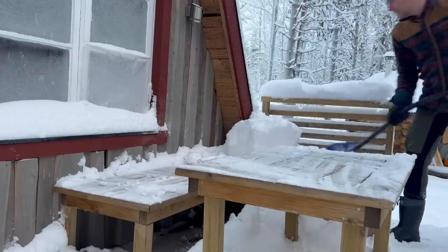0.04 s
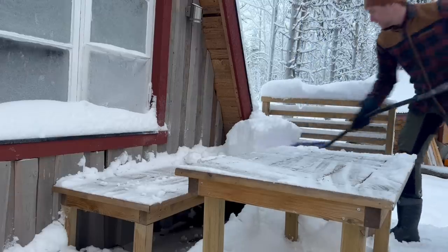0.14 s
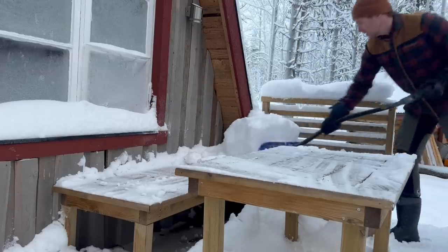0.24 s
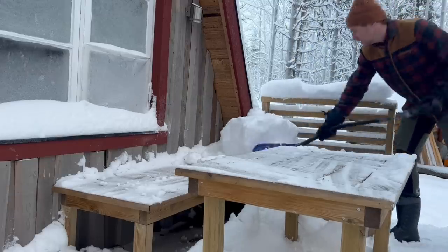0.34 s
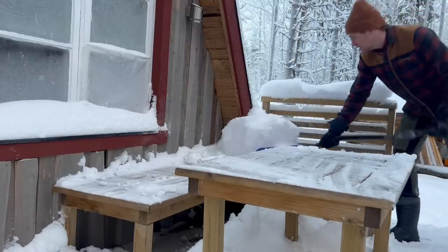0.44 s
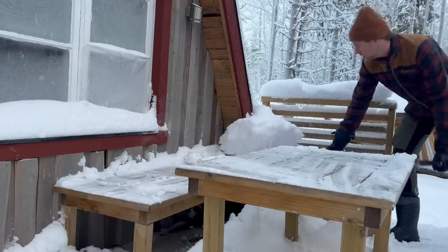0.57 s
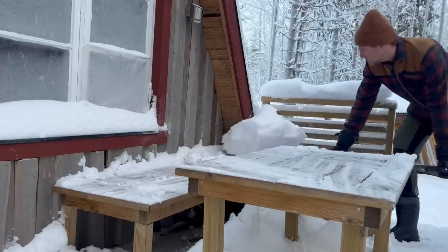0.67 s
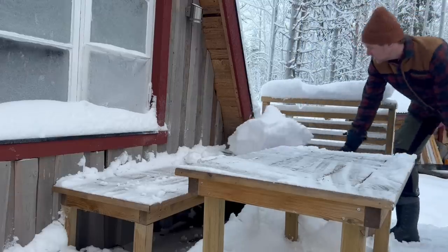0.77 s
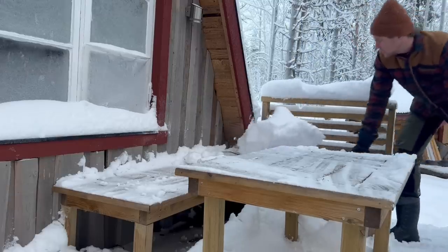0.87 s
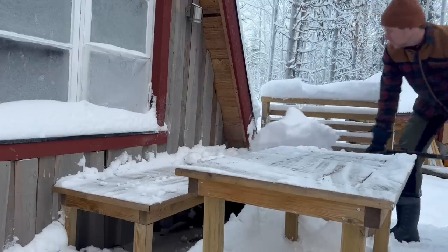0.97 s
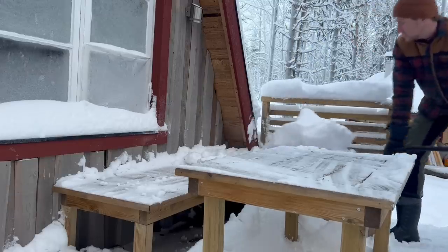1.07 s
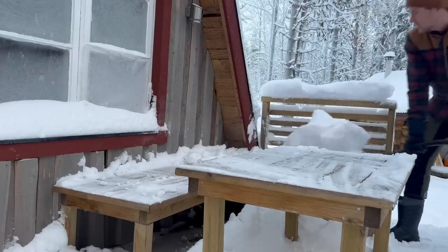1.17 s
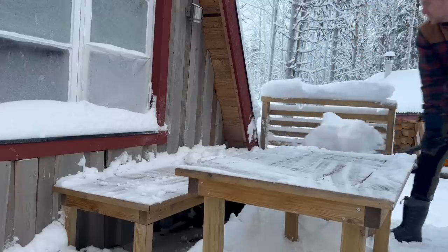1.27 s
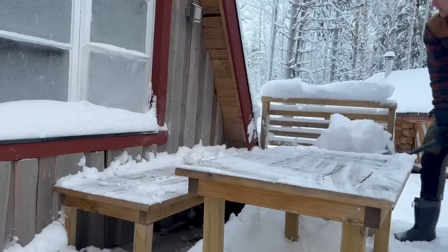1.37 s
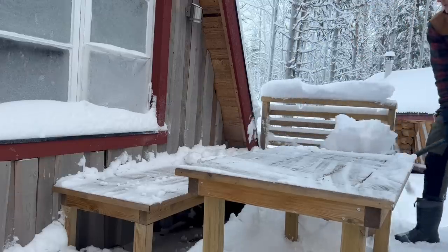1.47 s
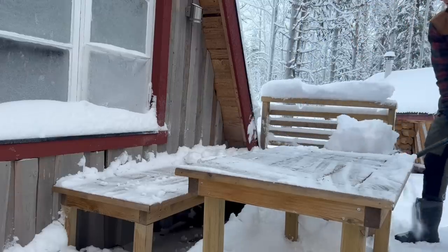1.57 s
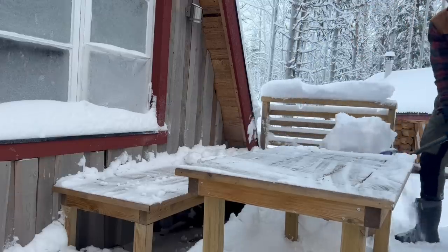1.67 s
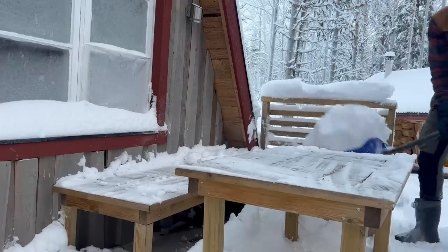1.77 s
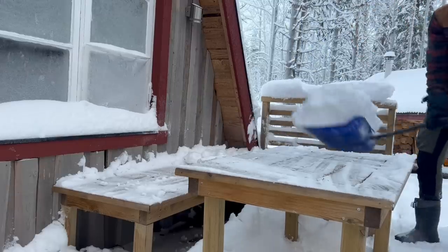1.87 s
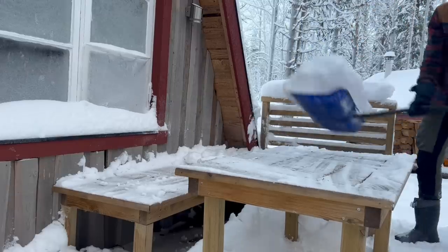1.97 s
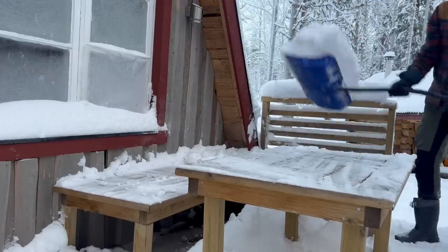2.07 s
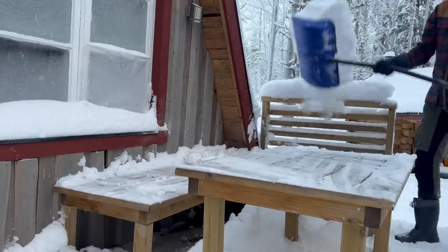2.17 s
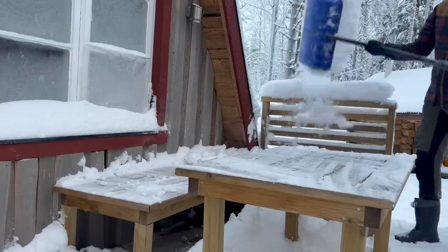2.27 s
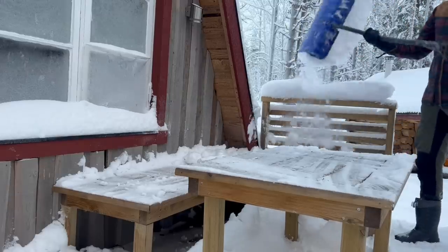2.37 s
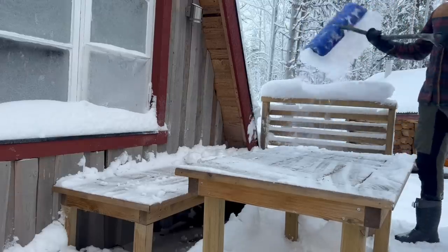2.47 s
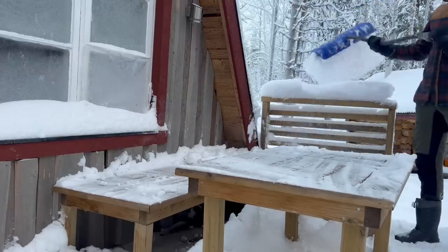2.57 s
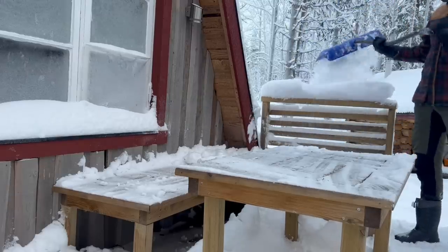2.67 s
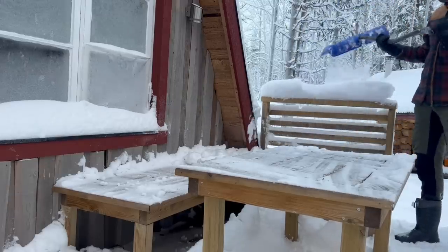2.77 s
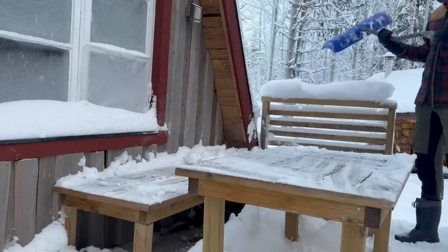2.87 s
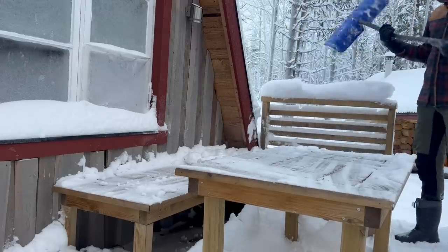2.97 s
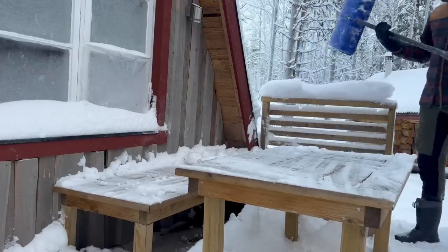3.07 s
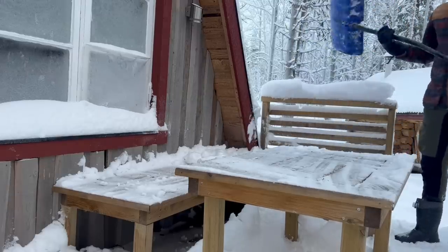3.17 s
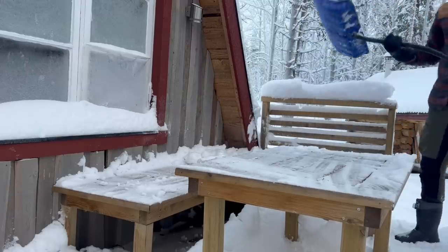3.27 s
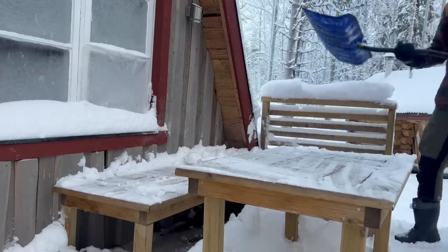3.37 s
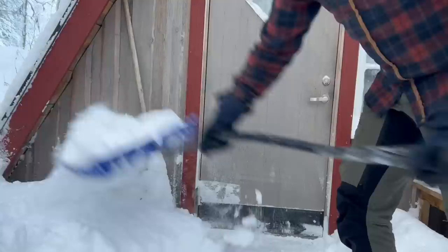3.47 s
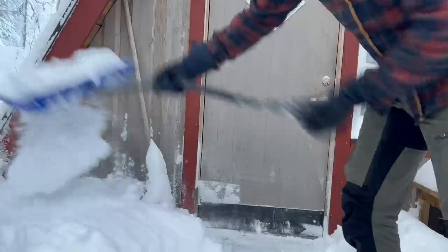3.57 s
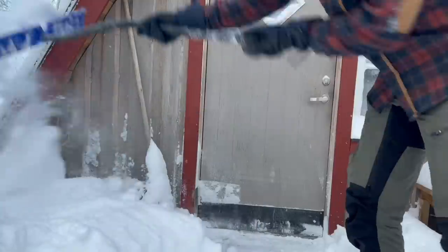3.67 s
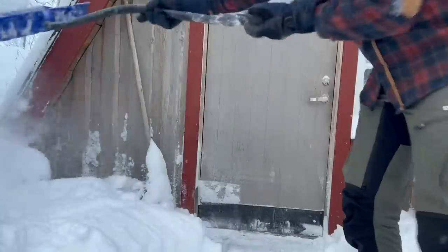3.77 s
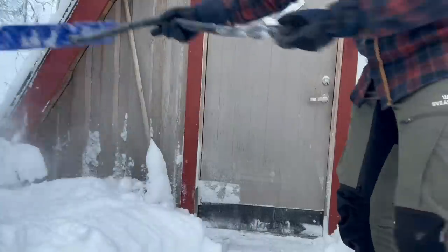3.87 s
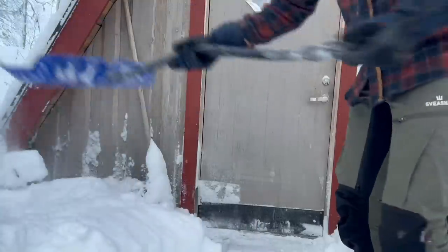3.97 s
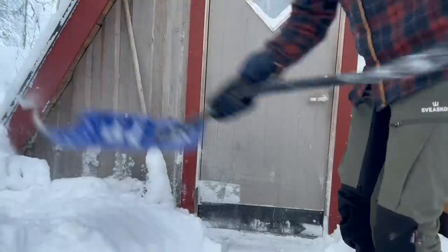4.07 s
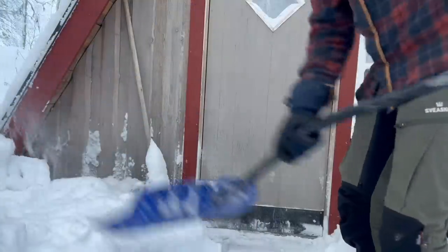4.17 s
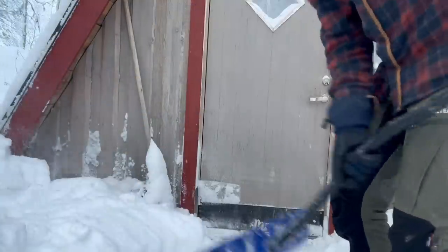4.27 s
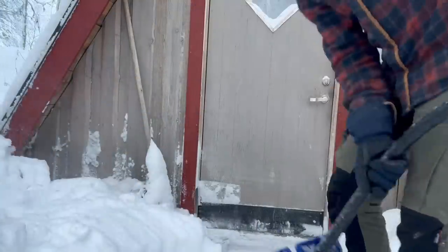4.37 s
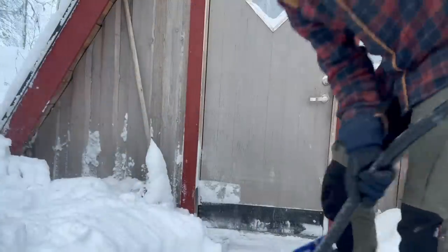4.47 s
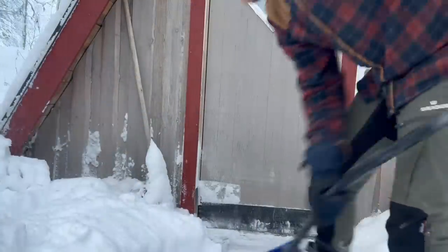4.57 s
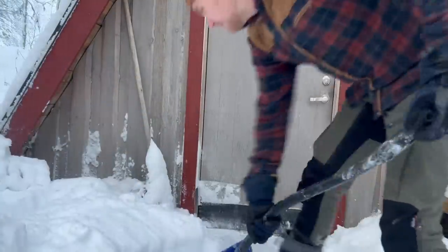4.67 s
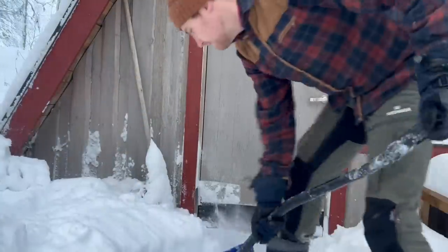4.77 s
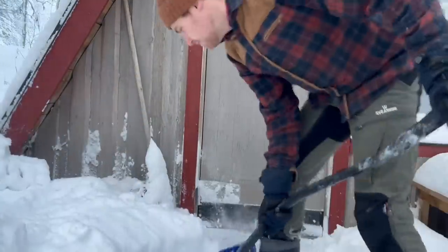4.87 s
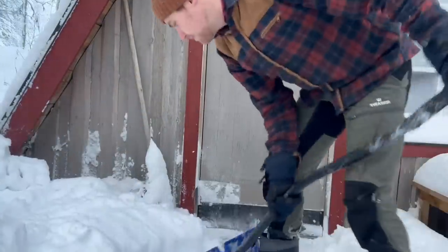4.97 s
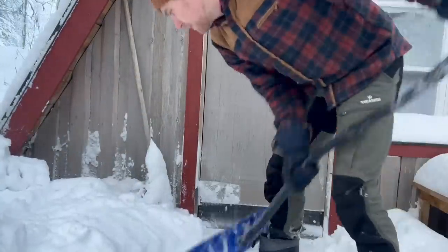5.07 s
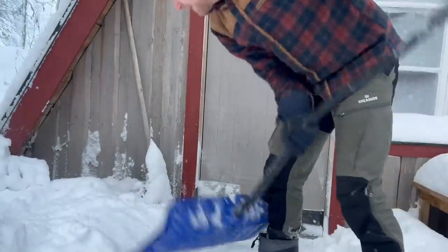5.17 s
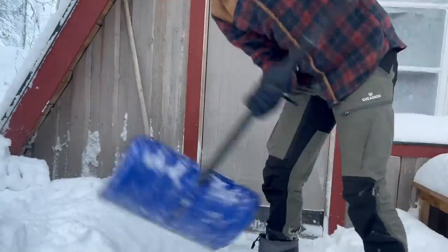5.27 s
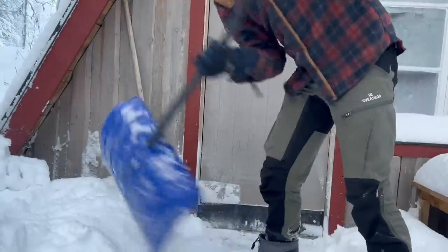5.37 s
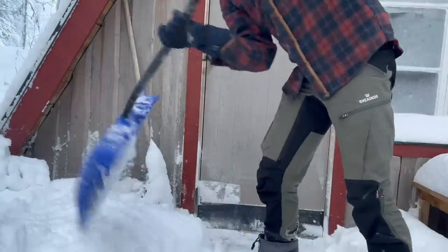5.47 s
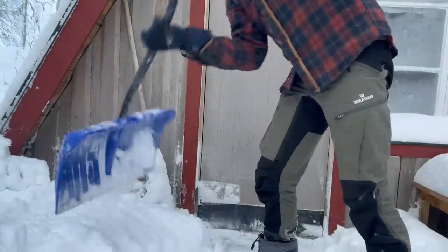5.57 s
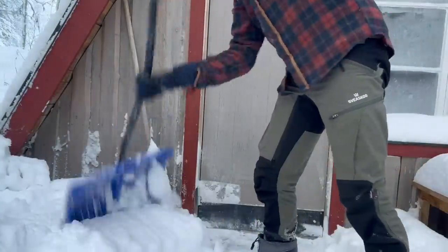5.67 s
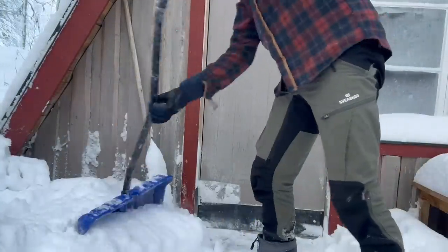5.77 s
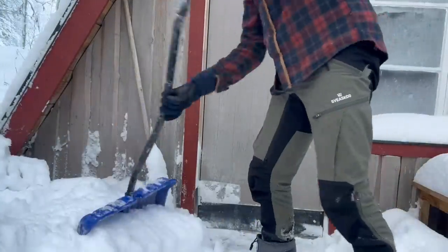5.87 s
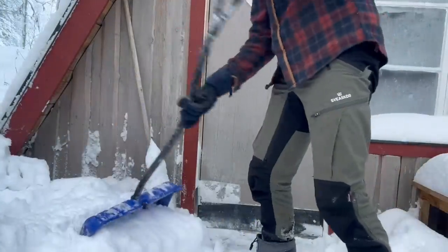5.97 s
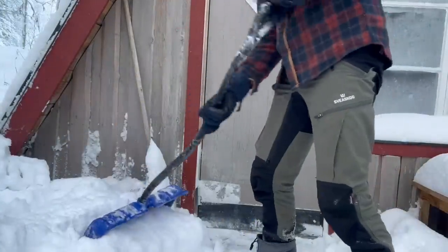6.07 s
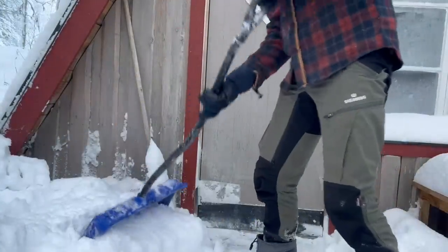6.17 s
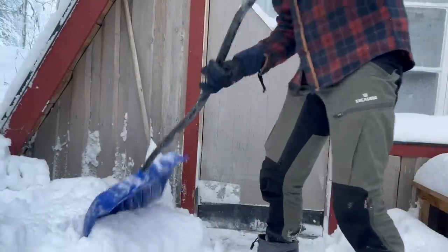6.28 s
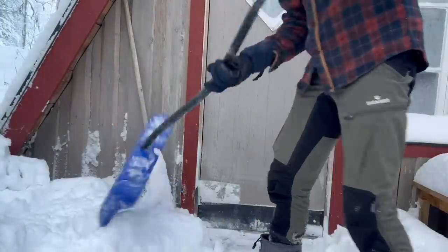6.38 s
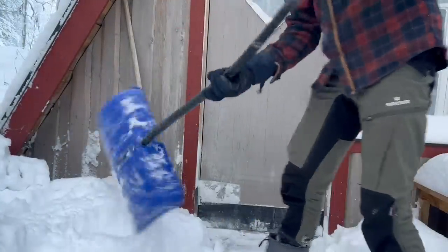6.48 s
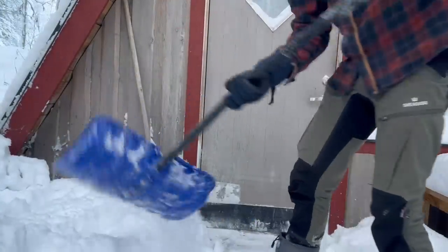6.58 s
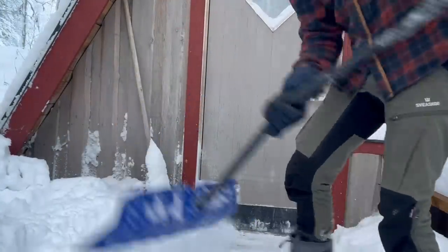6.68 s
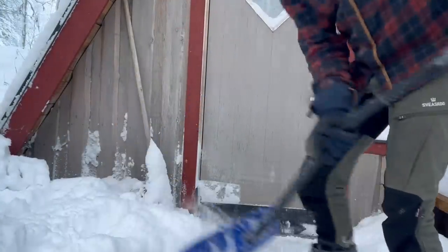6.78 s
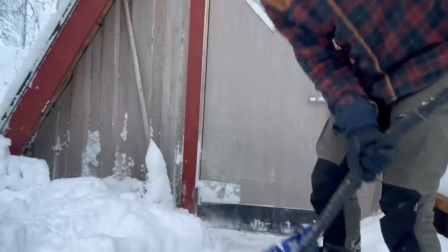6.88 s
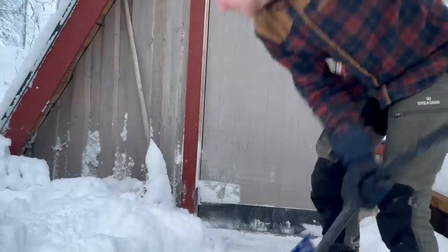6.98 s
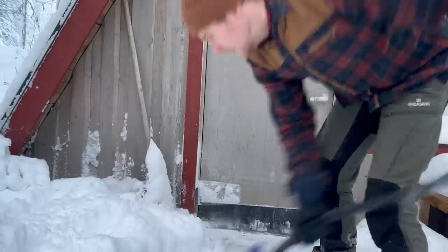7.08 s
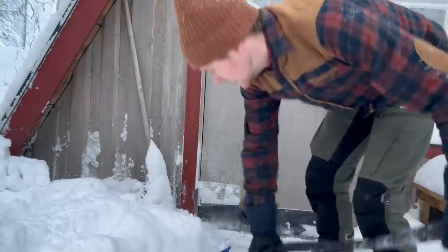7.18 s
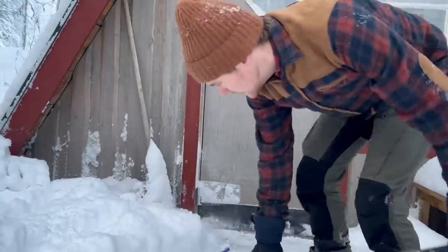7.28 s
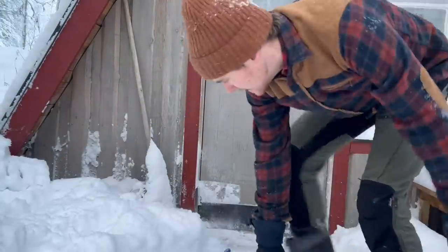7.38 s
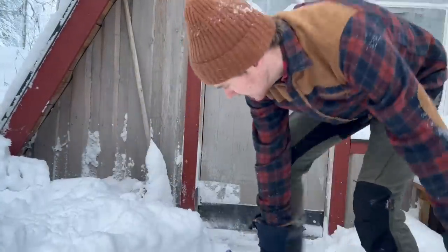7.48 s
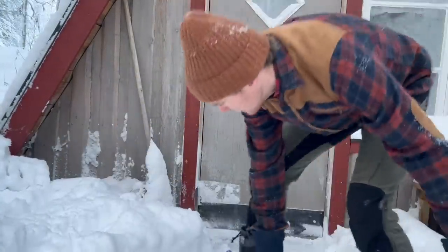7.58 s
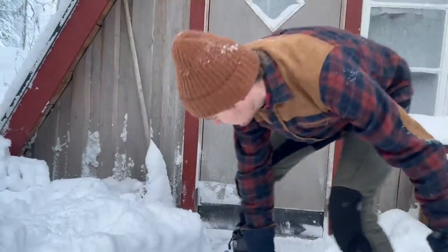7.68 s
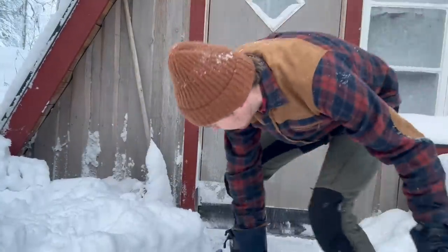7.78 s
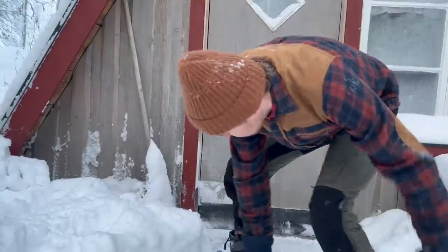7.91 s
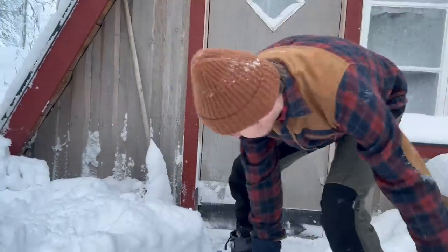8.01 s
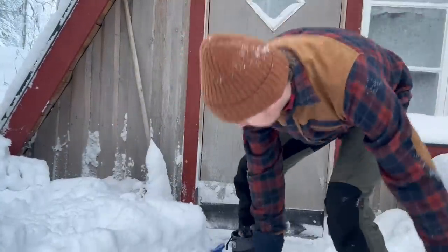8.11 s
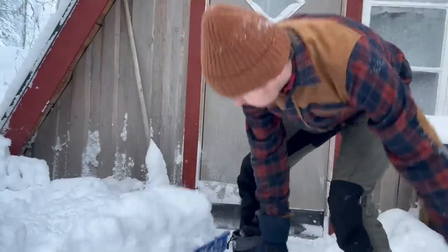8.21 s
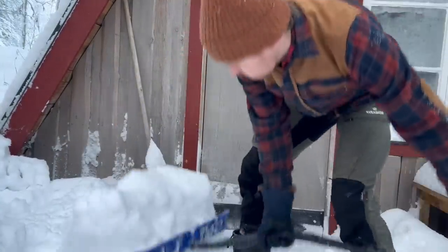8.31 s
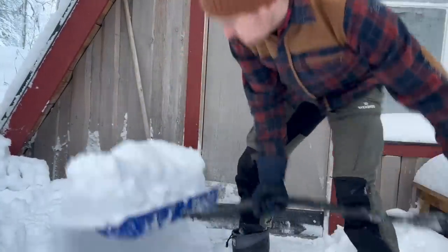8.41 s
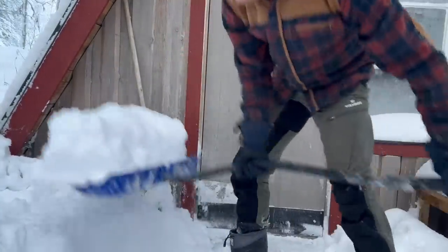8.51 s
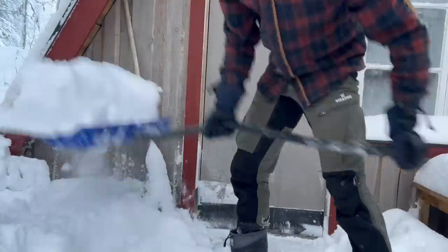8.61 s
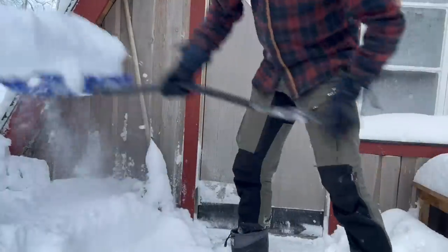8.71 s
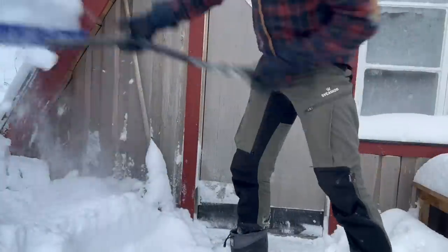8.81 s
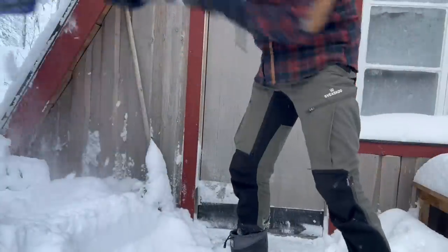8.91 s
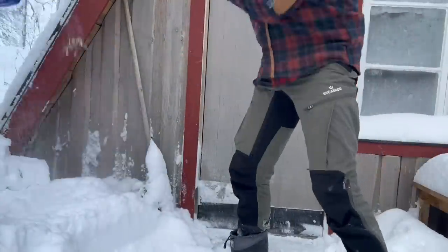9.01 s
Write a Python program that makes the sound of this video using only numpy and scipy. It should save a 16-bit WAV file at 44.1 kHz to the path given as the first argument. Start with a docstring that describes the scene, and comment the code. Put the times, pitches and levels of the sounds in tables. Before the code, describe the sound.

Plastic shovel scrapes hard over icy wooden boards, then quiet snow crunches, hollow plank thuds, sharp knocks and uneven scoops follow outdoors in still winter air.

```python
"""A plastic shovel edge scrapes and thuds over a wooden deck at once; stroke after stroke it is pushed and emptied.
Random slips ring the blade, filtered noise and tiny fractures make the snow hiss and crunch, bursts make knocks and ticks.
Boots, blade and falling lumps thud on planks that answer with a falling chirp and a low boom of decaying sines.
Crumbs, creaks, squawks and board hums join in; a short diffuse tail is the house wall, over faint winter air."""
import sys
import numpy as np
from scipy import signal
from scipy.fft import rfft, irfft, next_fast_len
from scipy.io import wavfile
from scipy.ndimage import uniform_filter1d

SR = 44100
rng = np.random.default_rng(int(sys.argv[2]) if len(sys.argv) > 2 else 0)


def transcribe(signal):
    """Save signal, clipped to [-1, 1], as a 16-bit WAV file at the path in sys.argv[1]."""
    frames = np.atleast_2d(signal).T
    limited = np.clip(frames, -1, 1)
    pcm = np.round(limited * 32767).astype(np.int16)
    wavfile.write(sys.argv[1], SR, pcm)


N = 399083

# Event levels are cue levels: most sources add their own trim.
# blows on the planks: start_s, peak_db, boom_db (relative), hardness_db (relative)
THUDS = [(0.027, -16.5, -11, -12), (0.582, -22.5, -3.5, -24), (0.916, -24, 4, -12), (1.039, -33, -8, -5),
         (1.757, -22, -24, -18), (1.96, -36.5, -22, -15), (2.13, -41, -26, -5), (2.456, -29.5, 0.5, -15),
         (2.609, -22, -2, -18.5), (2.754, -34.5, -4, -19), (3.263, -32, -6, -22), (3.3, -26, -14, -19),
         (3.396, -23.5, 4, -27), (3.425, -32, 4, -25), (4.12, -18.5, 3.5, -23), (4.158, -22.5, 1, -11),
         (4.183, -18, -8, -14), (4.215, -16.5, -1, -14.5), (4.324, -21.5, -5, -16.5),
         (4.359, -15.5, -1, -13), (4.476, -21, 9, -15.5), (4.631, -14, -12, -21), (4.864, -17, -1, -8),
         (4.991, -9, -6.5, -17.5), (5.266, -22.5, -3, -25), (5.285, -27.5, -20, -27),
         (5.319, -24.5, -5, -16), (5.401, -28.5, -1, -9), (5.652, -16.5, -19, -10), (5.735, -19, -21, -41),
         (5.779, -22.5, -10, -12), (5.797, -17.5, -11, -23), (5.822, -18.5, -5.5, -13),
         (6.08, -16, -22, -14), (6.1, -18, -5.5, -12), (6.35, -36, -18, -5), (6.372, -26.5, 3, -5),
         (6.503, -22.5, -6, -17), (6.622, -22.5, -15, -6.5), (6.634, -20.5, 2, -8.5),
         (7.039, -5, -24, -8.5), (7.591, -21, 4, -8), (8.13, -19, -28, -16), (8.427, -24, -18, -18),
         (8.494, -19.5, -20, -12), (8.522, -19, -15, -21), (8.547, -24, -15, -9), (8.585, -23.5, 0, -19),
         (8.619, -26.5, -8, -5), (8.753, -18, -6, -17), (8.805, -20, -2.5, -15)]
# ice and grit snapping against the blade: start_s, peak_db, brightness_db (relative), rattle_db (relative)
TICKS = [(0.448, -23.5, -15, -13), (0.554, -28, -7, -1), (0.652, -21, -20, -11.5), (1.33, -23, 12, -6),
         (1.463, -18.5, -2, -21), (1.551, -33.5, -7, -13), (3.548, -32.5, -28, 8), (4.158, -36.5, -6, -23),
         (4.1814, -31, -11, -23), (4.215, -39, -3, -14), (4.359, -41.5, -7, -24), (4.403, -24, -25, -14),
         (4.411, -29, -20, -12), (4.423, -21, 3, -14), (4.4505, -21.5, -2, -20), (4.606, -11, -21, -9),
         (4.821, -14, -23, -19), (5.494, -35, -5, 3), (6.87, -19.5, -21.5, -12), (7.418, -29, -26, -4),
         (7.468, -26.5, -24, -22), (8.545, -30.5, -42, -14), (8.715, -16, -31.5, -5.5)]
# resonances of the blade: pitch_hz, width_hz, level_db
BLADE_MODES = [(580, 91, -8.5), (717, 65, -12.5), (850, 46, -6.5), (941, 52, -5.5), (1056, 25, -5.5),
               (1396, 28, -3.5), (1630, 82, -20), (2020, 55, -21), (2400, 52, -17), (2720, 50, -19),
               (3110, 31, -6)]
# modes of the deck on its joists, unloaded: pitch_hz, level_db, t60_s
JOIST_MODES = [(56.5, 0, 0.19), (62.7, 5.5, 0.22), (73.3, -2.5, 0.33), (96, 1.5, 0.27), (113, -2.5, 0.25),
               (142.3, -4, 0.14), (176, -4, 0.091)]
# spectrum of the edge on wood: frequency_hz, density_db (per Hz)
EDGE_SPECTRUM = [(150, -25.5), (380, 2.5), (550, 2), (900, -1.5), (1250, -2.5), (1900, -8), (2900, -13.5),
                 (3800, -26), (8000, -55.5)]
# spectrum of moving snow: frequency_hz, density_db (per Hz)
SNOW_SPECTRUM = [(700, -13), (1800, 7), (3000, 3), (4600, 2.5), (6200, 0), (8400, 5.5), (10000, -11.5),
                 (12000, -3.5), (14500, -10.5), (16000, -1.5)]
# spectrum of the juddering planks: frequency_hz, density_db (per Hz)
PLANK_SPECTRUM = [(50, -26), (105, 0.5), (165, 4.5), (215, 4.5), (260, 0.5), (330, 2), (450, -3),
                  (650, -16), (1200, -22), (3000, -75)]
# spectrum of a blow on the planks: frequency_hz, density_db (per Hz)
BLOW_SPECTRUM = [(30, -5.5), (70, 3.5), (140, 8), (280, 1.5), (480, -7.5), (900, -11), (1600, -31.5),
                 (4000, -33), (12000, -66)]
# spectrum of a snapping tick: frequency_hz, density_db (per Hz)
SNAP_SPECTRUM = [(300, -12), (1000, -4), (1700, 2), (3300, -1), (5000, 6), (7500, 10), (10000, 10),
                 (16000, -12)]
# spectrum of the winter air: frequency_hz, density_db (per Hz)
AIR_SPECTRUM = [(20, -21), (65, 11.5), (130, -23), (300, -17), (600, -20), (1200, -41), (4000, -54),
                (9000, -34), (16000, -31)]
# stereo width before its trim: frequency_hz, side_minus_mid_db
WIDTH = [(60, -16), (200, -7.5), (400, -9.5), (700, -1.5), (2000, -9.5), (2800, -3), (5700, -2.5),
         (6700, -12), (9500, -62), (14000, -29)]
# stereo lean: frequency_hz, left_minus_right_db
LEAN = [(60, 2.5), (150, 2), (350, -1.7), (1300, -1), (4400, 2.5), (9000, 0)]
# echo between wall and deck: frequency_hz, t60_s
PORCH_DECAY = [(100, 0.33), (1000, 0.031), (4000, 0.095), (14000, 0.018)]
# stutter of the edge, deepest near 7.5 s; the end depths hold before and after:
# time_s, depth_db (below zero turns the sawtooth over)
STUTTER = [(7.31, -1), (7.39, 6), (7.49, 27), (7.52, -3)]
# the blade pushed over the boards: start_s, length_s, change_db (along the push), scrape_db, hiss_db, judder_db
PUSHES = [(0.024, 0.11, 1, -20.5, -36, -26.5), (0.139, 0.16, -7.5, -21, -28.5, -32),
          (0.324, 0.08, 4.5, -40, -46, -43.5), (0.43, 0.25, -9, -44.5, -47, -41.5),
          (0.515, 0.057, -3, -39, -43, -56), (0.608, 0.05, -0.5, -39, -43, -42),
          (0.688, 0.2, -0.5, -36.5, -39, -42.5), (0.825, 0.09, 2, -37, -46, -46),
          (0.914, 0.16, -6.5, -34, -41.5, -31), (1.025, 0.19, 0, -42, -40.5, -33),
          (1.243, 0.14, 0, -41, -41.5, -39), (1.865, 0.029, 1.5, -53.5, -66, -56),
          (1.973, 0.052, 8, -60, -69, -66), (4.41, 0.043, 4, -42.5, -54, -54),
          (4.611, 0.038, 5.5, -20, -25, -20), (4.728, 0.14, 0, -28.5, -36.5, -20.5),
          (4.873, 0.2, -3, -39.5, -44, -43), (5.634, 0.066, 6.5, -40, -39, -35.5),
          (6.684, 0.17, 2, -51.5, -55.5, -44.5), (6.877, 0.032, 0.5, -40, -41, -44),
          (6.997, 0.059, 3.5, -24, -26, -19.5), (7.082, 0.035, -1, -17, -22.5, -17.5),
          (7.137, 0.35, -9, -36, -37.5, -28), (7.53, 0.041, -12.5, -40.5, -39, -31),
          (7.58, 0.16, -4, -39, -44, -31), (7.655, 0.12, 5, -35.5, -42, -30.5),
          (7.82, 0.17, 3.5, -39, -48, -33.5), (7.998, 0.2, -4, -43.5, -48, -35),
          (8.258, 0.21, -11, -45, -51, -48), (8.46, 0.043, 1.5, -37.5, -48.5, -46)]
# snow packing under a boot or the blade: start_s, length_s, swell_db, level_db
SQUEEZES = [(1.517, 0.16, -2.5, -38), (1.7, 0.1, 7.5, -49.5), (1.978, 0.21, 0, -52),
            (2.244, 0.17, 6.5, -48), (2.82, 0.19, 5, -53.5), (3.26, 0.18, 1, -40), (4.056, 0.21, -10, -36),
            (5.145, 0.13, -26, -31.5), (5.788, 0.072, -2.5, -28.5), (5.888, 0.074, -1.5, -27.5),
            (5.984, 0.12, -6, -33), (6.224, 0.084, 2, -42), (6.363, 0.11, 6.5, -34.5),
            (6.977, 0.04, -24, -30), (8.464, 0.069, -12.5, -32.5), (8.6, 0.15, -15, -36.5),
            (8.782, 0.078, -7.5, -32.5)]
# loose snow sliding over the blade or showering down: start_s, length_s, change_db, hiss_db
SLIDES = [(1.465, 0.016, -15, -37), (1.701, 0.046, -13, -48.5), (1.755, 0.33, -10, -62),
          (2.039, 0.025, 10, -63.5), (2.404, 0.13, 11.5, -61), (2.976, 0.11, -4.5, -54.5),
          (3.559, 0.11, 7, -43), (3.697, 0.23, -17, -43), (3.892, 0.11, 4.5, -52), (4.02, 0.29, 8, -61),
          (4.57, 0.046, -9, -44), (5.128, 0.071, 10.5, -51), (5.228, 0.19, -7, -48.5),
          (5.515, 0.027, 5.5, -59.5), (5.84, 0.21, 5, -51), (6.13, 0.47, 1.5, -51), (8.439, 0.46, 6, -51),
          (8.954, 0.03, 8, -47)]
# a boot putting weight on the deck: start_s, length_s, boom_db
STEPS = [(-0, 0.23, -26), (0.844, 0.5, -27.5), (2.486, 0.37, -45), (2.973, 0.01, -32), (3.276, 0.15, -27.5),
         (3.55, 0.036, -22.5), (3.8, 0.5, -33), (4.194, 0.25, -29.5), (4.769, 0.055, -13.5),
         (5.462, 0.081, -37), (5.69, 0.072, -24.5), (6.446, 0.13, -29), (6.977, 0.1, -17),
         (7.59, 0.028, -15)]
# spectrum of fine powder in the air: frequency_hz, density_db (per Hz)
SPRAY_SPECTRUM = [(3000, -31), (8000, -16), (12000, 16), (16000, 9)]
# the edge sticking and squawking: start_s, length_s, pitch_hz, width_hz, level_db
SQUAWKS = [(0.09, 0.0092, 1730, 199, -23), (4.416, 0.024, 2150, 900, -37), (4.733, 0.079, 2260, 800, -38.5)]
# the blade knocking on a board edge or frozen lump, or creaking under load: start_s, peak_db
KNOCKS = [(0.286, -17), (0.45, -25), (0.683, -23), (0.736, -23), (0.874, -26), (0.916, -18), (1.102, -22.5),
          (1.197, -24), (1.621, -53), (1.969, -38), (2.001, -38), (2.072, -34), (2.611, -42.5),
          (4.611, -9.5), (4.66, -12), (5.779, -37), (5.823, -34), (6.757, -31.5), (6.801, -29),
          (6.969, -25), (7.044, -5)]
# a loose board humming under a boot or the blade: start_s, length_s, pitch_hz (centre of its waver), level_db
BOARDS = [(0.02, 0.083, 184, -28.5), (0.916, 0.091, 188, -30.5), (2.314, 0.099, 235, -40),
          (3.277, 0.2, 135, -38), (4.612, 0.02, 258, -18.5), (5.926, 0.024, 222, -28),
          (6.433, 0.047, 237, -36.5), (8.46, 0.18, 145, -35), (8.495, 0.17, 113, -31.5)]

# attack and release are the time for 20 dB
PUSH_ATTACK_S, PUSH_RELEASE_S = 0.019, 0.051
SQUEEZE_ATTACK_S, SQUEEZE_RELEASE_S = 0.061, 0.033
SLIDE_ATTACK_S, SLIDE_RELEASE_S = 0.016, 0.086
STEP_ATTACK_S, STEP_RELEASE_S = 0.067, 0.098
SQUEEZE_SCRAPE_DB, SQUEEZE_HISS_DB, SQUEEZE_JUDDER_DB = -11.5, -23.5, -2.5  # against the squeeze's level
SLIDE_SCRAPE_DB, SLIDE_JUDDER_DB = -1, -2  # against the slide's hiss
REST_SCRAPE_DB, REST_HISS_DB, REST_JUDDER_DB = -69, -76, -62  # snow settling between strokes
UNEVEN_DB, UNEVEN_RATE_HZ = 2, 38  # the crust gives way unevenly
BOOM_DB, BOOM_FOLLOWS = -9.5, 0.67  # the joists answer the judder: boom = BOOM_DB + BOOM_FOLLOWS * judder dB
CRUMB_DB, CRUMB_FOLLOWS = -10.5, 1  # harder scraping makes the crushed lumps louder, by the same rule
TOP_HZ = 15900  # upper band limit

SIZE = 16384  # samples in an impulse response
HZ = np.fft.rfftfreq(SIZE, 1 / SR)
TIME = np.arange(N) / SR
CLOCK = np.arange(0, N / SR, .001)  # coarse time for movements, s


def amp(db):
    """Decibels to gain."""
    return 10 ** (np.asarray(db) / 20)


def unit(x):
    """x at rms 1."""
    return x / np.sqrt(np.mean(x ** 2) + 1e-20)


def peaking(x, db):
    """x with its peak at db."""
    return amp(db) * x / np.abs(x).max()


def along(points, hz=HZ):
    """(Hz, value) points joined on a log axis."""
    f, v = np.transpose(points)
    return np.interp(np.log(hz + 1), np.log(f + 1), v)


def wobble(rate):
    """A smooth random curve held within -2 to 2, rate knots a second."""
    knots = rng.standard_normal(int(N * rate / SR) + 4)
    curve = np.interp(np.arange(N) * rate / SR, np.arange(len(knots)), knots)
    return 2 * np.tanh(curve / 2)


def causal(db):
    """The minimum-phase impulse response with these levels on HZ."""
    cepstrum = irfft(np.log(np.maximum(amp(db), 1e-6)))
    # fold the cepstrum forwards in time
    cepstrum[1:SIZE // 2] *= 2
    cepstrum[SIZE // 2 + 1:] = 0
    return irfft(np.exp(rfft(cepstrum)))


def through(x, response):
    """x rings a body with this impulse response."""
    return signal.fftconvolve(x, response)[:N]


def ring(x, response):
    """As through, but white input keeps its level."""
    return through(x, response / np.linalg.norm(response))


def add(track, s, sound):
    """Mix a sound into the track at time s."""
    start = max(round(s * SR), 0)
    part = track[start:start + len(sound)]
    part += sound[:len(part)]


def grains(rate, spread_db, clump_rate, clump_db):
    """Tiny fractures of uneven size that come in clumps; rms 1."""
    sizes = rng.choice([-1, 1], N) * amp(spread_db * rng.uniform(-2.1, 1.2, N))
    breaks = rng.random(N) < rate / SR
    return unit(breaks * sizes * amp(clump_db * wobble(clump_rate)))


def roaming(x, depth_db):
    """As the point of contact moves, single resonances wax and wane."""
    z = signal.stft(x, nperseg=1024)[2]
    field = uniform_filter1d(rng.standard_normal(z.shape), size=3, axis=0)  # across frequency
    field = uniform_filter1d(field, size=4, axis=1)  # across time
    gains = unit(amp(depth_db * np.tanh(unit(field))))
    return signal.istft(z * gains, nperseg=1024)[1][:N]


def gesture(s, length, change_db, attack, release):
    """Gain of one movement on the CLOCK: it sets in, swells or sags evenly for its length, and dies away."""
    t = CLOCK - s
    outside = np.maximum(-t, 0) / attack + np.maximum(t - length, 0) / release
    return 10 ** -np.minimum(outside, 10) * amp(change_db * np.clip(t / length, 0, 1))


def level(gains):
    """The summed power of gains on the CLOCK, in dB for each sample."""
    power_db = 10 * np.log10(np.sum(np.square(gains), axis=0))
    return np.interp(TIME, CLOCK, power_db)


def air(level_db=-56):
    """The faint rumble of winter air: steady noise weighted to the bass."""
    return amp(level_db) * ring(rng.standard_normal(N), causal(along(AIR_SPECTRUM)))


def echo():
    """A short diffuse answer of wall and boards, each band dying at its own pace; energy 1."""
    hz, t, z = signal.stft(rng.standard_normal(SIZE), SR, nperseg=256)
    decay = amp(-60 * t / along(PORCH_DECAY, hz)[:, None])
    tail = signal.istft(z * decay, SR, nperseg=256)[1]
    return tail / np.linalg.norm(tail)


def porch(direct, oblique, wet_db=-17, width_db=-1, near_t60=0.016):
    """Close surfaces scatter sound in from the sides; the wall adds a brief tail."""
    paths = rng.standard_normal(SIZE) * amp(-60 * np.arange(SIZE) / SR / near_t60)
    diffuse = along([(200, 0), (600, 1)])  # long waves pass small surfaces unscattered
    phase = np.pi / 2 + diffuse * np.angle(rfft(paths))
    scatter = irfft(np.exp(1j * phase))[:SIZE // 4]  # smears time, keeps colour
    mid = direct + amp(wet_db) * through(direct, echo())
    side = through(ring(oblique, scatter), causal(along(WIDTH) + width_db))
    lean_db = along(LEAN) / 2
    left = through(mid + side, causal(lean_db))
    right = through(mid - side, causal(-lean_db))
    return np.array([left, right])


def bending(db, sweep):
    """A plank carries high notes faster than low ones: a blow arrives as a chirp that falls over about sweep s."""
    delay = sweep * np.maximum(np.sqrt(100 / (HZ + 10)) - 1 / 4, 0)
    phase = 2 * np.pi * np.cumsum(delay) * SR / SIZE
    return irfft(rfft(causal(db)) * np.exp(1j * (phase[-1] - phase)))[:SIZE // 2]


def joists(scatter_db, swell):
    """The deck's low modes swell in over swell s and decay, in a new mix at each call."""
    t = np.arange(SIZE) / SR
    chance = rng.standard_normal((len(JOIST_MODES), 2))
    modes = 0
    for (hz, db, t60), (louder, phase) in zip(JOIST_MODES, chance):
        decay = amp(db + scatter_db * louder - 60 * t / t60)
        modes = modes + decay * np.sin(2 * np.pi * hz * t + np.pi * phase)
    return modes * (1 - np.exp(-t / swell))


def weight(judder_db):
    """Level in dB of the joists' boom: it follows the judder and swells under each step."""
    steps = [amp(db) * gesture(s, length, 0, STEP_ATTACK_S, STEP_RELEASE_S) for s, length, db in STEPS]
    answer_db = BOOM_DB + BOOM_FOLLOWS * judder_db
    return 10 * np.log10(amp(level(steps)) ** 2 + amp(answer_db) ** 2)


def deck(judder_db, boom_db, plank_db=-2.5, joist_db=-4.5):
    """Snow packing under boots and blade shakes the planks in many small jolts, and the joists hum along."""
    jolts = roaming(grains(rate=480, spread_db=2.0, clump_rate=34, clump_db=0.5), depth_db=4.0)
    planks = ring(jolts * amp(judder_db + plank_db), bending(along(PLANK_SPECTRUM), sweep=0.0139))
    load = grains(rate=300, spread_db=3.0, clump_rate=15.0, clump_db=-2.5)
    damping = amp(-60 * np.arange(SIZE) / SR)  # a loaded deck rings shorter
    boom = ring(load * amp(boom_db + joist_db), joists(scatter_db=0.5, swell=0.0031) * damping)
    return planks + boom


def boards(attack=0.0096, release=0.044, waver=0.053, waver_rate=60, flutter_db=2):
    """One board's own note, a sine wavering as the load on it shifts."""
    track = np.zeros(N)
    turns = np.cumsum(1 + waver * wobble(waver_rate)) / SR
    for s, length, hz, db in BOARDS:
        gain = np.interp(TIME, CLOCK, gesture(s, length, 0, attack, release))
        track += amp(db) * gain * np.sqrt(2) * np.sin(2 * np.pi * hz * turns)
    return track * amp(flutter_db * wobble(waver_rate))


def creaks(level_db=-6, pitch_hz=310, scatter_octaves=0.506, overshoot=1.235, fall_s=0.0027,
           t60=0.045, size_db=2.5, count=1000):
    """Cold snow gives way under load in separate small collapses, each a falling chirp with its own pitch."""
    squeezes = [amp(db) * gesture(s, length, swell, SQUEEZE_ATTACK_S, SQUEEZE_RELEASE_S)
                for s, length, swell, db in SQUEEZES]
    track, t = np.zeros(N), np.arange(SIZE // 8) / SR
    settled = 1 - np.exp(-t / fall_s)
    for k, (late, high, big, phase) in enumerate(rng.standard_normal((count, 4))):
        final_hz = pitch_hz * 2 ** (scatter_octaves * np.tanh(high))
        turns = final_hz * (t + overshoot * fall_s * settled)
        decay = amp(size_db * np.tanh(big) - 60 * t / t60)
        chirp = np.sin(2 * np.pi * (turns + phase)) * settled * decay
        add(track, (k + np.tanh(late)) * N / SR / count, chirp)
    return unit(track) * amp(level(squeezes) + level_db)


def thuds(sweep=0.01122, chirp_db=-0.5, boom_db=-3, usual_hardness_db=-12, follow=0.97,
          rattle=0.81, rattle_t60=0.064, crust_db=3, crust_t60=0.038):
    """Single blows on the planks: the harder the contact, the brighter the chirp and the more the crust crunches."""
    track, t = np.zeros(N), np.arange(SIZE // 4) / SR
    treble = along([(300, 0), (1100, 1)])
    edge = causal(along(EDGE_SPECTRUM))
    for s, db, low_db, hard_db in THUDS:
        blow_db = along(BLOW_SPECTRUM) + follow * (hard_db - usual_hardness_db) * treble
        chirp = bending(blow_db, sweep * np.exp(0.235 * rng.standard_normal()))
        # rebounds from the plank ends roughen the first contact
        contact = rng.standard_normal(len(t)) ** 3 * amp(-60 * t / rattle_t60)
        contact *= rattle / np.linalg.norm(contact)
        contact[0] = 1
        add(track, s, peaking(through(contact, chirp), db + chirp_db))
        crust = through(rng.standard_normal(len(t)) * amp(-60 * t / crust_t60), edge)
        add(track, s, peaking(crust, db + hard_db + crust_db))
        boom = joists(scatter_db=-0.5, swell=0.038)
        add(track, s + 0.0027, peaking(boom, db + low_db + boom_db))
    return track


def snow(hiss_db, powder_db=-4.0, crunch_db=-3.5, grit_db=-5, loudest_grit_db=-39):
    """Powder slides over the blade while crust breaks in small clusters and single ice grains crackle."""
    powder = amp(powder_db) * rng.standard_normal(N)
    crunch = amp(crunch_db) * grains(rate=2500, spread_db=0.5, clump_rate=160, clump_db=3.5)
    crackle = grains(rate=220, spread_db=1, clump_rate=30, clump_db=3.0)
    grit = amp(grit_db + np.minimum(hiss_db, loudest_grit_db)) * crackle
    return ring((powder + crunch) * amp(hiss_db) + grit, causal(along(SNOW_SPECTRUM)))


def spray(level_db=-9):
    """Loose snow throws off fine powder, brighter than snow under the blade."""
    slides = [amp(db) * gesture(s, length, change, SLIDE_ATTACK_S, SLIDE_RELEASE_S)
              for s, length, change, db in SLIDES]
    return ring(rng.standard_normal(N) * amp(level(slides) + level_db), causal(along(SPRAY_SPECTRUM)))


def crumbs(scrape_db, pitch_hz=1250, scatter_octaves=0.87, width_octaves=0.37, size_db=3,
           fall_db_per_octave=3, t60=0.062, count=950):
    """Lumps of packed snow burst one by one, each a short crunch with its own pitch."""
    track, size = np.zeros(N), SIZE // 16
    t, hz = np.arange(size) / SR, np.fft.rfftfreq(size, 1 / SR)
    times = (np.arange(count) + rng.uniform(0, 2, count)) * N / SR / count
    for s, (high, big, *noise) in zip(times, rng.standard_normal((count, size + 2))):
        octaves = scatter_octaves * np.clip(high, -2, 2)
        distance = (np.log2((hz + 1) / pitch_hz) - octaves) / width_octaves
        burst = unit(irfft(rfft(noise) * np.exp(-distance ** 2 / 2)))
        lump_db = size_db * np.tanh(big) - fall_db_per_octave * octaves
        add(track, s, burst * amp(lump_db - 60 * t / t60))
    return unit(track) * amp(CRUMB_DB + CRUMB_FOLLOWS * scrape_db)


def ticks(crack_t60=0.0051, rattle_t60=0.11, level_db=3, usual_bright_db=-8, follow=0.97):
    """Ice and grit give a sharp crack, then a short rattle of the blade."""
    track, t = np.zeros(N), np.arange(SIZE // 2) / SR
    treble = along([(3500, 0), (7000, 1)])
    for s, db, bright_db, rattle_db in TICKS:
        decay = amp(-60 * t / crack_t60) + amp(rattle_db - 60 * t / rattle_t60)
        burst = rng.standard_normal(len(t)) * decay
        snap_db = along(SNAP_SPECTRUM) + follow * (bright_db - usual_bright_db) * treble
        add(track, s + 0.0014, peaking(through(burst, causal(snap_db)), db + level_db))
    return track


def blade_db(ring_db):
    """Levels on HZ of the edge's sound, with the blade's resonances standing out of it."""
    peaks = sum(amp(db + ring_db) / (1 + (2 * (HZ - hz) / width) ** 2) for hz, width, db in BLADE_MODES)
    return along(EDGE_SPECTRUM) + 20 * np.log10(1 + peaks)


def knocks(contact_t60=0.021, ring_db=10):
    """A short rough contact that lets the blade ring freely."""
    track, t = np.zeros(N), np.arange(SIZE // 4) / SR
    blade = causal(blade_db(ring_db))
    for s, db in KNOCKS:
        contact = rng.standard_normal(len(t)) * amp(-60 * t / contact_t60)
        add(track, s, peaking(through(contact, blade), db))
    return track


def squawks(attack=0.014, release=0.014):
    """Where the edge sticks, its slips pour into one resonance of the blade."""
    track = np.zeros(N)
    for s, length, hz, width, db in SQUAWKS:
        resonance = causal(-20 * np.log10(1 + (2 * (HZ - hz) / width) ** 2))
        swell_db = level([gesture(s, length, 0, attack, release)])
        track += ring(rng.standard_normal(N) * amp(db + swell_db), resonance)
    return track


def catches(scrape_db, level_db=-2, strongest_db=-36, contact_t60=0.02):
    """Many times a second the edge snags on ice or wood grain and breaks free; a snag holds only so much force."""
    t = np.arange(SIZE // 8) / SR
    contact = rng.standard_normal(len(t)) * amp(-60 * t / contact_t60)
    breaks = grains(rate=70, spread_db=0.5, clump_rate=9.9, clump_db=1.5)
    snags = roaming(ring(breaks, contact), depth_db=2)
    force_db = np.minimum(scrape_db, strongest_db) + level_db
    return ring(snags * amp(force_db), causal(blade_db(ring_db=3.5)))


def stutter(slip_hz=95, uneven=0.27):
    """Stick and slip: a dB sawtooth that jumps at each slip and drifts back until the next."""
    turns = np.cumsum(slip_hz * np.exp(uneven * wobble(86))) / SR
    times, depths_db = np.transpose(STUTTER)
    return np.interp(TIME, times, depths_db) * (1 / 3 - turns % 1)


def scrape(scrape_db, ring_db=0, level_db=-3.5):
    """The edge catches and slips on icy wood; each slip rings the plastic blade."""
    slips = roaming(grains(rate=2200, spread_db=2.0, clump_rate=110, clump_db=0.0), depth_db=8.0)
    return ring(slips * amp(scrape_db + level_db), causal(blade_db(ring_db)))


def shovelling():
    """Levels in dB of scrape, hiss and judder: pushing, packing and sliding each stir all three."""
    moves = [(np.ones(len(CLOCK)), [REST_SCRAPE_DB, REST_HISS_DB, REST_JUDDER_DB])]
    for s, length, change, *levels in PUSHES:
        moves.append((gesture(s, length, change, PUSH_ATTACK_S, PUSH_RELEASE_S), levels))
    for s, length, swell, db in SQUEEZES:
        levels = [db + SQUEEZE_SCRAPE_DB, db + SQUEEZE_HISS_DB, db + SQUEEZE_JUDDER_DB]
        moves.append((gesture(s, length, swell, SQUEEZE_ATTACK_S, SQUEEZE_RELEASE_S), levels))
    for s, length, change, db in SLIDES:
        levels = [db + SLIDE_SCRAPE_DB, db, db + SLIDE_JUDDER_DB]
        moves.append((gesture(s, length, change, SLIDE_ATTACK_S, SLIDE_RELEASE_S), levels))
    gains, levels_db = map(np.array, zip(*moves))
    uneven_db = UNEVEN_DB * wobble(UNEVEN_RATE_HZ)
    return [level(gains * amp(db)[:, None]) + uneven_db for db in levels_db.T]


def scene():
    """Shovel, snow and deck over the faint rumble of winter air."""
    scrape_db, hiss_db, judder_db = shovelling()
    slip_db = stutter()
    common = air() + deck(judder_db, weight(judder_db)) + boards() + creaks() + thuds()
    common += spray() + crumbs(scrape_db + slip_db)
    common += ticks() + knocks() + squawks() + catches(scrape_db)
    # the wide blade sends different grains forwards and sideways
    forwards = scrape(scrape_db + slip_db) + snow(hiss_db + slip_db)
    sideways = scrape(scrape_db + slip_db) + snow(hiss_db + slip_db)
    return porch(common + forwards, common + sideways)


def record(dry, low_cut_hz=42, in_step_hz=6750, opposed_hz=10100):
    """Two microphones lose the deepest bass, drift out of phase in the treble and stop at a band limit."""
    size = next_fast_len(N + SIZE)
    hz = np.fft.rfftfreq(size, 1 / SR)
    low_cut = signal.butter(2, low_cut_hz, "highpass", fs=SR, output="sos")
    heard = signal.sosfilt(low_cut, dry)
    lag = np.pi * np.maximum(hz - in_step_hz, 0) / (opposed_hz - in_step_hz)
    ports = np.exp(1j * np.array([-lag, lag]) / 2)
    return irfft(rfft(heard, size) * ports * (hz < TOP_HZ), size)[:, :N]


dry = scene()
out = record(dry)
transcribe(out)
```